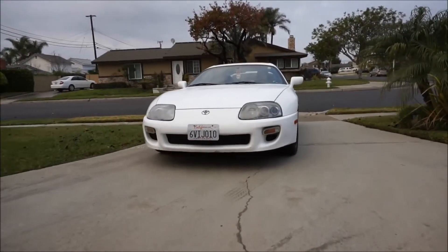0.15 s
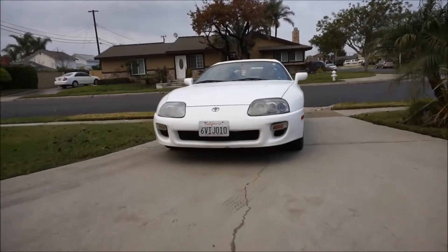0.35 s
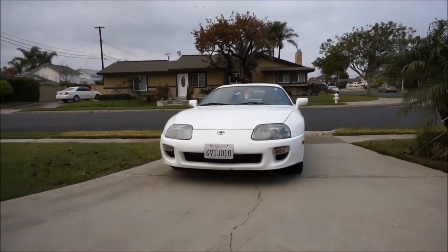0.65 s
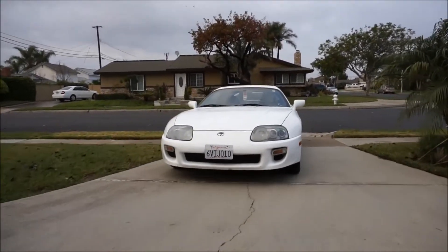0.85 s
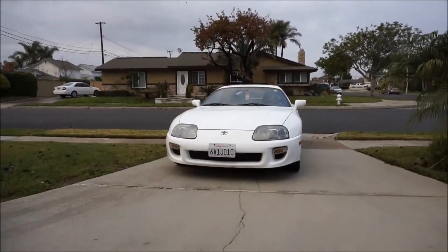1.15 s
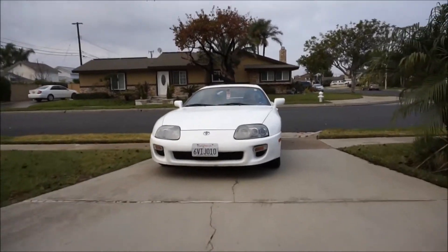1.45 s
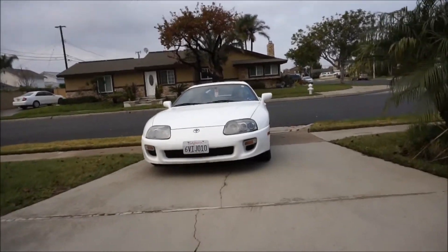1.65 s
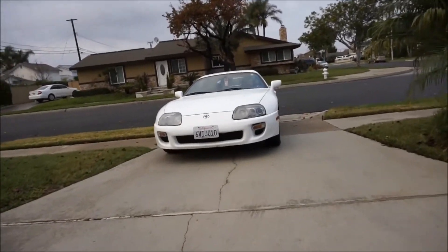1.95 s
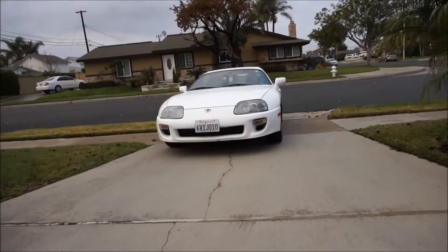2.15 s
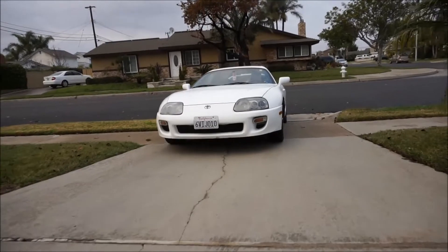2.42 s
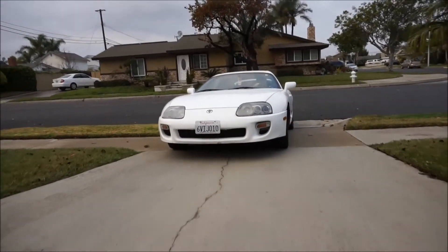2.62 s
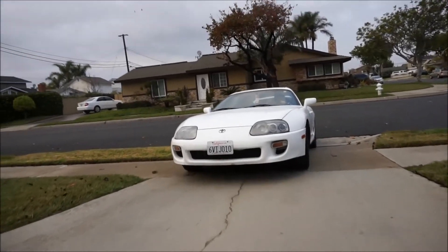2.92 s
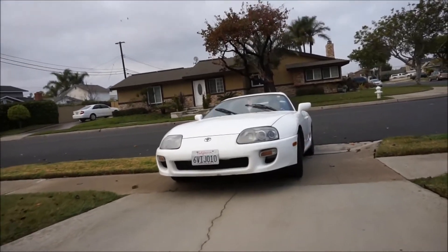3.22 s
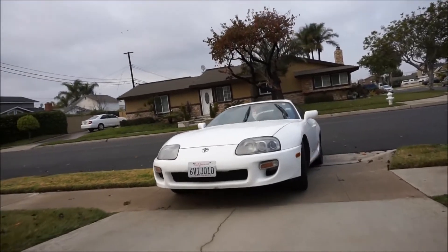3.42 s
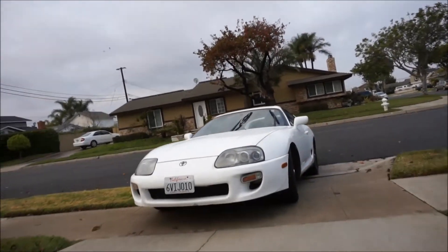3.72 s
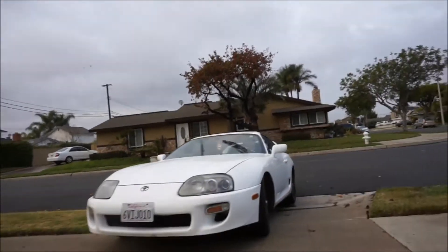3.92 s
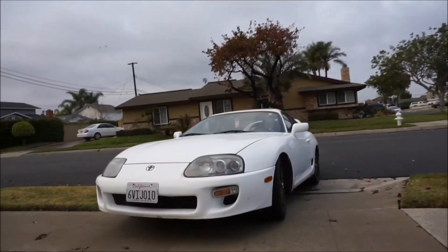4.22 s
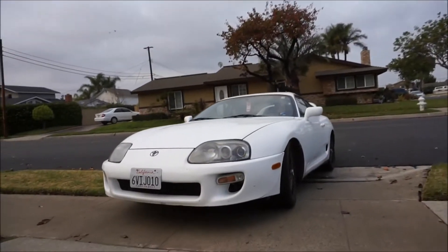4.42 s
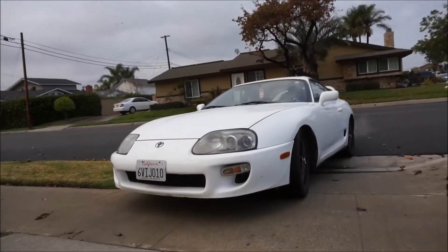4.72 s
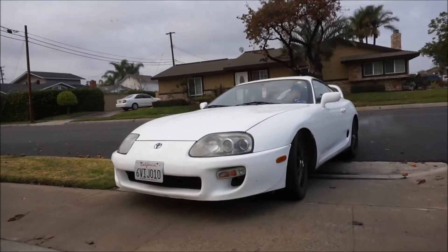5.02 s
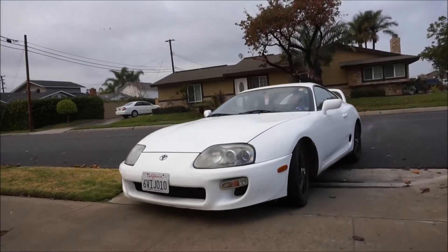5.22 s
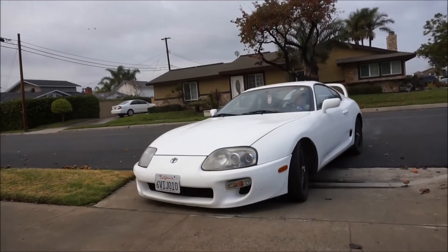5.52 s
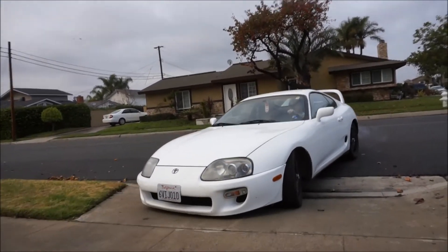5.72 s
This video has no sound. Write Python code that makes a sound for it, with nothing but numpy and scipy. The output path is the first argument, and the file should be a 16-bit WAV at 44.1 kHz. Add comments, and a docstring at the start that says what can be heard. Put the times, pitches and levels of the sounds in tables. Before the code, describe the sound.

Loud, boomy straight-six idle with engine-bay hiss and a few dull knocks, then a rising, blaring rev, stuttering squeals and falling revs.

```python
"""First a fast, droning idle: a straight-six sports car with an open exhaust backs down a driveway.
It is then revved up and drops back: crank orders sweep through the standing waves of the pipe over a rush of gas.
The engine bay whirrs and hisses from pulsed noise. Dull ringing knocks, light ticks, a thin hiss, a wiper swish
and a stuttering belt squeal sound on top; a limiter holds the peaks down."""
import sys
import numpy as np
from scipy import signal
from scipy.fft import rfft, irfft, next_fast_len
from scipy.io import wavfile
from scipy.ndimage import uniform_filter1d, minimum_filter1d

SR = 44100
rng = np.random.default_rng(int(sys.argv[2]) if len(sys.argv) > 2 else 0)


def store_wav(level_fs):
    """Save 16-bit WAV to argv[1]."""
    pcm = np.round(np.clip(np.atleast_2d(level_fs), -1, 1) * 32767)
    wavfile.write(sys.argv[1], SR, pcm.T.astype(np.int16))


N = 258862
TIME = np.arange(N) / SR
FFT_SIZE = next_fast_len(N, True)
BINS = np.maximum(np.fft.rfftfreq(FFT_SIZE, 1 / SR), 1)  # Hz

# The driver pulls away, takes the clutch out so that the revs flare, then lifts off
PULL_AT_S, OPEN_S = 3.834, 0.2
CLUTCH_OUT_AT_S, CLUTCH_S = 4.5, 0.13
LIFT_AT_S, SHUT_S = 4.97, 0.22
# The engine comes free of the load; the car turns its flank towards the microphone
FREE_AT_S, FREE_S = 4.54, 0.12
TURN_AT_S, TURN_S = 3.2, 1.25
# Crank speed over time: time_s, turns_per_s
CRANK_SPEED = [(0.0, 25.2), (1.13, 25.7), (1.52, 25.7), (2.79, 24.94), (3.78, 25.4), (4.0, 28),
               (4.23, 32.7), (4.56, 37.1), (4.63, 40.7), (4.74, 52.8), (4.79, 58), (4.86, 65.6),
               (4.94, 65.6), (5.03, 63.8), (5.41, 47.1), (5.68, 40), (5.87, 37.3)]

# How each layer follows the engine: idle_db, per_speed_doubling_db, load_db, full_strain_db, shut_throttle_db
EXHAUST_LAW = (0.85, 9.5, -2.5, -4.5, -17.5)  # on top of EXHAUST_IDLE
HISS_LAW = (3.5, 11.5, -6, 4, -6.5)  # on top of AIR_IDLE and the flank levels
SPRAY_LAW = (-2.5, 12.5, -5, 1, -9)  # on top of the high band of AIR_IDLE
RASP_LAW = (8.5, 10, -7.5, 1, -11)  # on top of the low band of AIR_IDLE
WHIRR_LAW = (-32, -1.5, 3, 5.5, -11)
RUMBLE_LAW = (-31.5, 1, -1, -8, -7)
GAS_LAW = (-20.5, -2, 5.5, 3, 4)  # relative to the exhaust note
LOPE_LAW = (0.35, -0.13, 0.8, 0.13, 0.2)  # depth of the uneven firing

# Low rumble spectrum: pitch_hz, level_db
RUMBLE_COLOUR = [(15, -11), (50, 3), (75, 3.5), (200, -43)]
# Stereo width: pitch_hz, side_minus_mid_db
STEREO_WIDTH = [(25, -13), (90, -27), (500, -13.5), (1000, -10), (4000, -5.5)]
# Lean to one side or the other: pitch_hz, left_minus_right_db
STEREO_LEAN = [(1400, 0), (3400, -2.5), (4300, 2), (6000, 1), (6600, 6.5), (7600, 0.7)]
# Reflections off concrete and body panels: first_delay_ms, last_delay_ms, gain relative to the direct sound
REFLECTIONS = [(4.4, 3.6, 0.15), (8.2, 9.3, 0.22)]

# Thin high hiss, one event: start_s, fade_start_s, level_db
WASHER_HISS = (1.92, 2.15, -33.5)
# Its broad resonance: pitch_hz, width_hz, level_db
WASHER_COLOUR = [(13100, 7900, 0)]
# Wiper swish envelope: time_s, level_db
WIPER_SWELL = [(3.6, -64), (3.68, -41), (3.74, -29), (3.8, -60)]
# Wiper swish spectrum: pitch_hz, level_db
WIPER_COLOUR = [(2000, -45), (3700, -1), (4500, -3), (6000, -10), (14000, -21)]
# Light ticks: start_s, level_db (before the common gain of the ticks)
TICKS = [(.305, -9), (3.928, -12), (4.018, -15)]
# Dull knocks: start_s, level_db, pitch as a share of the usual, crack_db relative to the knock
KNOCKS = [(0.806, -19, 1.45, 0.5), (1.124, -12, 1.17, -10.5), (1.142, -13, 0.91, -12),
          (1.207, -12.5, 1.1, -15), (1.533, -2.5, 1.18, -21), (1.606, -5.5, 1.3, -26),
          (1.617, -5.5, 1.26, -30), (3.524, -5, 1.08, -11), (3.53, -7.5, 1.42, -8), (3.537, -1, 0.79, -8),
          (3.546, 1, 0.99, -15), (3.774, -6, 0.69, -14), (3.781, -2, 1.06, -19), (3.789, -1.5, 1.14, -16)]
# Modes of the knocked body: pitch_hz, usual_level_db, t60_s
KNOCK_MODES = [(393, -5, 0.027), (549, 1, 0.042), (681, -6.5, 0.024), (862, -7.5, 0.022),
               (1125, -24, 0.036)]
# Belt slips: start_s, length_s, middle_pitch_hz, level_db
SQUEALS = [(4.845, .022, 1410, -17), (4.885, 0.054, 1420, -23), (4.935, 0.1, 1410, -26),
           (5.02, 0.04, 1624, -21), (5.05, .027, 1570, -13.5), (5.085, 0.036, 1600, -17),
           (5.122, 0.036, 1570, -17), (5.27, 0.038, 1325, -27)]
SQUEAL_SAG = 0.039  # share of its pitch that a squeal loses

# Engine hiss while rolling at idle: time_s, low_band_db, middle_band_db, high_band_db
AIR_IDLE = [(0.0, -32.5, -36, -31.5), (0.7, -34.5, -33.5, -32.5), (1.2, -36.5, -39.5, -35.5),
            (1.6, -36.5, -39.5, -35), (2.0, -34, -37, -34.5), (2.62, -30.5, -31.5, -31),
            (2.85, -34, -34.5, -34.5), (3.48, -35.5, -35.5, -35.5)]
# Splits between the hiss bands: low_to_middle_hz, middle_to_high_hz
BAND_EDGES_HZ = (3000, 4400)
# From the flank, the treble of the hiss grows faster with speed
FLANK_DB, FLANK_TREBLE_DB, TREBLE_DB_PER_DOUBLING = -31, -36, 4.5
# Engine bay resonances: pitch_hz, width_hz, ahead_db, flank_db
BAY_MODES = [(1957, 130, 7, -16.5), (2207, 205, -6, 3.5), (2730, 340, 0.5, -1), (3360, 285, -6.5, 5),
             (3534, 240, 2.5, -16), (5005, 167, 2, 1.5), (5380, 530, -3.5, -2.5), (6400, 330, 3, 1.5),
             (6770, 340, -3, 1), (7520, 190, -6.5, -3.5)]
# Smooth bed under those resonances: pitch_hz, level_db
BAY_BED = [(500, -43), (1000, -0.5), (1800, -0.5), (2450, -7.5), (3500, -3), (7000, -6), (8500, -15),
           (11000, -44)]
# Top layer of the hiss: pitch_hz, level_db
SPRAY_COLOUR = [(6000, -16), (8300, -1), (11400, 0.5), (11950, 5), (12500, 3), (13700, -2), (15000, -3.5),
                (15900, -7.5)]
# Belt drive resonances: pitch_hz, width_hz, idle_db, load_db
WHIRR_MODES = [(1330, 89, 0.5, -3.5), (1428, 84, -2, 4), (1600, 123, -5, -10)]
STROKE_JITTER_TURNS = .012
# Rasp resonances at idle: pitch_hz, width_hz, level_db
RASP_IDLE = [(427, 280, -2), (575, 123, 2), (638, 45, -0.5), (860, 113, -2)]
# Rasp resonances under load: pitch_hz, width_hz, level_db
RASP_LOAD = [(475, 61, 0), (550, 75, -3), (658, 63, -4.5), (860, 160, -8)]
# Blare at the top of the revs, one event: start_s, peak_s, release_s, level_db
BLARE = (4.78, 5.08, 0.06, -21.5)
# Pipe mode that blares: pitch_hz, width_hz, level_db
BLARE_MODE = [(555, 55, 0)]

# Gas rush spectrum: pitch_hz, level_db
GAS_COLOUR = [(50, -24), (90, -7), (180, 1.5), (300, -5.5), (400, -7.5), (700, -46)]
# Exhaust while rolling at idle: time_s, level_db, drone_top_share_db, drone_low_share_db
EXHAUST_IDLE = [(0.0, -9, -10, -8), (0.34, -10.5, -13.5, -4), (0.55, -11, 0, -3), (0.85, -10.5, -12, -3.5),
                (1.07, -12.5, 0, -1.5), (1.62, -14, -7, -1), (1.88, -10, -3.5, -5.5), (2.14, -13, -8, -5.5),
                (2.6, -11, -4.5, 0.5), (3.23, -8, -13, -1), (3.61, -10.5, -8.5, -3), (3.75, -11, -8, -2)]
# Balance of crank orders 2 to 13, one row each: idle_db, load_db, free_revving_db, shut_throttle_db
ORDERS = [(14, 13, 14.5, 13.5), (-13, -4.5, 11, 8.5), (7.5, 4.5, 11.5, 12), (5.5, 1.5, 0.5, 2),
          (2.5, 7.5, 8.5, 5.5), (5.5, -13, -0.5, -6), (-0.5, 5.5, -0.5, -5.5), (-14, -4.5, -4.5, -6.5),
          (-0.5, -0.5, -5, -10), (-10, -24, -21, -7), (-5, -4, -12, -19), (-11.5, -3, -11, -19)]
# Standing waves of the exhaust pipe: pitch_hz, width_hz, level_db
PIPE_MODES = [(96.8, 14.9, -8), (170.6, 16.4, -2), (197.4, 13.8, -5.5), (235.3, 20.3, -4),
              (257.5, 16.3, -6), (320, 17.6, -10), (486, 28, -9), (540.8, 60, -4)]
# Stumbles as the engine takes up the load: middle_s, half_length_s, level_db
STUMBLES = [(3.85, 0.034, -4.5), (3.957, 0.018, -7.5)]
# Top of the drone: its band and usual share; then the usual share of its low tone, the fourth order
DRONE_TOP_HZ, DRONE_TOP_WIDTH_HZ, DRONE_TOP_DB = 256, 39, -9
DRONE_LOW_DB = -3.5
# The pipe booms as the second order sweeps through its lowest standing wave
BOOM_HZ, BOOM_WIDTH_HZ, BOOM_DB = 94.6, 23, 4.5
# Phase jitter grows with frequency squared: under load, and for each speed doubling per second
ROUGH_RAD_PER_KHZ2, SURGE_ROUGH = 1.9, .5

LIMIT_DB, RELEASE_DB_PER_S, CUTOFF_HZ = -.5, 45.5, 15850


def from_db(db):
    """Decibels to gain."""
    return 10 ** (np.asarray(db) / 20)


def rms_one(x):
    """Scale to unit rms."""
    return x / np.sqrt(np.mean(x ** 2) + 1e-20)


def in_time(rows):
    """Each column of a curve at every sample."""
    s, *columns = np.transpose(rows)
    return [np.interp(TIME, s, c) for c in columns]


def ramp(start_s, length_s):
    """Straight rise from 0 to 1."""
    return np.clip((TIME - start_s) / length_s, 0, 1)


def smooth_gain(points):
    """Gain at every frequency from a short spectrum."""
    hz, db = np.transpose(points)
    return from_db(np.interp(np.log(BINS), np.log(hz), db))


def resonance(hz, centre_hz, damping_hz):
    """Complex response of one damped mode, 1 at its centre."""
    return 1 / (1 + 1j * (hz ** 2 - centre_hz ** 2) / (hz * damping_hz))


def peak_gain(modes):
    """Gain of a group of steep-sided resonances, each a mode squared, summed by power."""
    power = 0
    for hz, width_hz, db in modes:
        # squaring narrows the peak; 1.63 brings its -3 dB width back to about width_hz
        peak = from_db(db) * abs(resonance(BINS, hz, 1.63 * width_hz)) ** 2
        power = power + peak ** 2
    return np.sqrt(power)


def coloured(x, gain):
    """Filter a mid and a side signal into left and right; rms 1."""
    mid, side = rfft(x, FFT_SIZE) * gain * [np.ones_like(BINS), smooth_gain(STEREO_WIDTH)]
    lean = np.sqrt(smooth_gain(STEREO_LEAN))
    return rms_one(irfft([(mid + side) * lean, (mid - side) / lean])[:, :N])


def white():
    """Two unrelated noises."""
    return rng.standard_normal((2, N))


def drift(rate_hz):
    """Random wander with rms 1: noise smoothed twice at rate_hz, drawn at every 40th sample."""
    r = np.exp(-80 * np.pi * rate_hz / SR)
    raw = rng.standard_normal(N // 40 + 2002)
    slow = signal.lfilter([1], [1, -2 * r, r * r], raw)[2000:]  # skip the settling
    return np.interp(np.arange(N) / 40, np.arange(len(slow)), rms_one(slow))


def puffs(turns, depth_db, uneven_db):
    """Noise that swells with the crank's turning, with a random wander in level."""
    beat = sum(np.cos(2 * np.pi * k * turns) for k in (1, 2, 3))
    return white() * from_db(depth_db * beat + uneven_db * drift(36))


def strokes(turns, spread_db, uneven_db, count=12):
    """Sharp contacts every two turns, each with its own place and strength, never quite on time; rms 1."""
    places = (np.arange(count) + rng.random(count)) / count
    sizes_db = rng.normal(0, spread_db, count)
    when = 2 * (np.arange(int(turns[-1] / 2))[:, None] + places)
    when = when + rng.normal(0, STROKE_JITTER_TURNS, when.shape)
    at = np.minimum(np.searchsorted(turns, when), N - 1)
    clicks = np.zeros((2, N))
    clicks[:, at] = from_db(sizes_db + rng.normal(0, uneven_db, (2, *when.shape)))
    return rms_one(clicks)


def driving(rev_hz):
    """Engine state: speed doublings above idle, then load, strain and shut throttle, each 0-1."""
    strain = ramp(PULL_AT_S, CLUTCH_OUT_AT_S - PULL_AT_S) ** 2 * (1 - ramp(CLUTCH_OUT_AT_S, CLUTCH_S))
    return np.array([np.log2(rev_hz / rev_hz[0]), ramp(PULL_AT_S, OPEN_S), strain, ramp(LIFT_AT_S, SHUT_S)])


def follow(law, state):
    """A value at idle plus what speed, load, strain and the shut throttle add to it."""
    return law[0] + np.dot(law[1:], state)


def reflected(x):
    """Near surfaces comb the sound; the ridges drift as the car rolls away."""
    echoes, power = 0, 1
    for first_ms, last_ms, gain in REFLECTIONS:
        heard_at = TIME - np.linspace(first_ms, last_ms, N) / 1000
        echoes = echoes + gain * np.array([np.interp(heard_at, TIME, side) for side in x])
        power += gain ** 2
    return (x + echoes) / np.sqrt(power)


def rumble(state):
    """Low noise bed whose level follows the engine."""
    colour = smooth_gain(RUMBLE_COLOUR) / (1 + (BINS / 400) ** 2)
    return from_db(follow(RUMBLE_LAW, state)) * coloured(white(), colour)


def washer(attack_s, release_s):
    """Thin, high noise hiss, probably the washer jets ahead of the wipers."""
    start_s, fade_s, db = WASHER_HISS
    swell = ramp(start_s, attack_s) * (1 - ramp(fade_s, release_s))
    return from_db(db) * swell * coloured(white(), peak_gain(WASHER_COLOUR))


def wiper():
    """Wiper rubber sweeps the glass: a swell of coloured noise."""
    return from_db(in_time(WIPER_SWELL)[0]) * coloured(white(), smooth_gain(WIPER_COLOUR))


def ticks(t60_s):
    """Light ticks: bright noise that starts at once and decays exponentially."""
    bursts = sum((TIME >= s) * from_db(db - 60 * abs(TIME - s) / t60_s) for s, db in TICKS)
    return 0.45 * bursts * coloured(white(), peak_gain([(7000, 9000, 0)]))


def knocks(crack_t60_s, crack_top_hz, grains_per_s):
    """Each knock is a short gritty crack over the ringing modes of one dull body, randomly balanced."""
    out, t = np.zeros(N), TIME[:SR // 8]
    muffle = signal.butter(2, [420, crack_top_hz], "band", fs=SR, output="sos")
    for start_s, db, pitch, crack_db in KNOCKS:
        ring = 0
        for m, (hz, level_db, t60_s) in enumerate(KNOCK_MODES):
            decay = from_db(level_db + rng.normal(0, 1) - 60 * t / t60_s)
            ring = ring + (-1) ** m * decay * np.sin(2 * np.pi * hz * pitch * t)
        grains = rng.standard_normal(len(t)) * (rng.random(len(t)) < grains_per_s / SR)
        crack = rms_one(signal.sosfilt(muffle, grains)) * from_db(crack_db - 60 * t / crack_t60_s)
        out[round(start_s * SR):][:len(t)] += from_db(db) * (ring + crack)
    return out


def squeal(waver, edge_s):
    """The belt slips and grips as the revs turn over: each slip is a short, sharp-edged, sagging tone."""
    out, wobble = 0, 1 + waver * drift(64.1)
    for start_s, length_s, hz, db in SQUEALS:
        pitch_hz = hz * wobble * (1 - SQUEAL_SAG * (ramp(start_s, length_s) - .5))
        gate = ramp(start_s, edge_s) * (1 - ramp(start_s + length_s - edge_s, edge_s))
        out = out + from_db(db) * gate * np.sin(2 * np.pi * np.cumsum(pitch_hz) / SR)
    return out


def engine_bay(turns, doublings, bands_db, hiss_db, spray_db):
    """Fan and intake air, coloured by cavities under the bonnet; the colour shifts as the car turns."""
    bed, turned = smooth_gain(BAY_BED), ramp(TURN_AT_S, TURN_S)
    airs = puffs(turns, depth_db=0.3, uneven_db=1.0), puffs(turns, depth_db=0.67, uneven_db=.5)
    ahead = np.hypot(bed, peak_gain([(hz, width, db) for hz, width, db, _ in BAY_MODES]))
    aside = np.hypot(bed, peak_gain([(hz, width, db) for hz, width, _, db in BAY_MODES]))
    band = np.digitize(BINS, BAND_EDGES_HZ)
    front = sum(from_db(db) * coloured(airs[k % 2], ahead * (band == k)) for k, db in enumerate(bands_db))
    treble_db = FLANK_TREBLE_DB + TREBLE_DB_PER_DOUBLING * doublings
    treble = from_db(treble_db) * coloured(airs[0], aside * (band == 2))
    flank = from_db(FLANK_DB) * coloured(airs[1], aside * (band < 2)) + treble
    spray_air = puffs(turns, depth_db=0.27, uneven_db=1.03)
    spray = from_db(spray_db) * coloured(spray_air, smooth_gain(SPRAY_COLOUR))
    return from_db(hiss_db) * ((1 - turned) * front + turned * flank) + spray


def whirr(turns, load):
    """The belt drive chatters in a narrow band whose resonances change balance under load."""
    contacts = from_db(-4.5) * strokes(turns, spread_db=0.0, uneven_db=5.0)
    chatter = puffs(turns, depth_db=-1.5, uneven_db=1.0) + contacts
    idle = coloured(chatter, peak_gain([(hz, width, db) for hz, width, db, _ in WHIRR_MODES]))
    loaded = coloured(chatter, peak_gain([(hz, width, db) for hz, width, _, db in WHIRR_MODES]))
    return (1 - load) * idle + load * loaded


def rasp(turns, load):
    """Cracks and puffs of gas ring the upper pipe modes, which darken and throb under load."""
    cracks = from_db(-2.5) * strokes(turns, spread_db=1.0, uneven_db=1.5)
    idle = coloured(cracks + puffs(turns, depth_db=0.0, uneven_db=2.0), peak_gain(RASP_IDLE))
    loaded = coloured(cracks + puffs(turns, depth_db=1.5, uneven_db=-1.0), peak_gain(RASP_LOAD))
    return np.sqrt(1 - load) * idle + np.sqrt(load) * loaded


def blare(turns):
    """One pipe mode blares once in two turns; it builds up, then stops as the throttle closes."""
    start_s, peak_s, release_s, db = BLARE
    swell = ramp(start_s, peak_s - start_s) * (1 - ramp(peak_s, release_s))
    pulsed = white() * (1 + np.cos(np.pi * turns))
    return from_db(db) * swell * coloured(pulsed, peak_gain(BLARE_MODE))


def gas_rush(turns):
    """Turbulent gas: low noise that pulses with the crank."""
    colour = smooth_gain(GAS_COLOUR) / (1 + (BINS / 700) ** 4)
    return coloured(puffs(turns, depth_db=0.5, uneven_db=1.5), colour)


def crank_orders(turns, rev_hz, state, surge, top_db, low_db, waver_db, spread):
    """Sines at multiples of the crank rate, each swelling as it crosses a standing wave of the pipe."""
    load, free, shut = state[1], ramp(FREE_AT_S, FREE_S), state[3]
    rough = ROUGH_RAD_PER_KHZ2 * load + SURGE_ROUGH * surge
    pipe, note, power = peak_gain(PIPE_MODES), 0, 0
    for k, (idle_db, load_db, free_db, shut_db) in enumerate(ORDERS, 2):
        hz = k * rev_hz
        in_drone_top = 1 / (1 + ((hz - DRONE_TOP_HZ) / DRONE_TOP_WIDTH_HZ) ** 4)
        db = idle_db + (top_db - DRONE_TOP_DB) * in_drone_top
        if k == 4:
            db = db + low_db - DRONE_LOW_DB
        for share, next_db in ((load, load_db), (free, free_db), (shut, shut_db)):
            db = db + share * (next_db - db)
        line = np.interp(hz, BINS, pipe) * from_db(db)
        power = power + line ** 2 / 2
        # staggered orders give an even hum at idle; under load they close up into one hard beat a turn
        phase = 2 * np.pi * k * turns + 1.85 * k ** 2 - load * np.angle(np.exp(1.5j * k ** 2))
        phase = phase + rough * (hz / 1000) ** 2 * drift(45)
        # echoes from the houses shift each order a little between the two ears
        ears = spread * np.maximum(hz / PIPE_MODES[1][0], 1) * drift(3.1) * np.array([[1], [-1]])
        note = note + line * (np.cos(phase) - ears * np.sin(phase)) * from_db(waver_db * drift(11))
    return note / np.sqrt(power)


def exhaust(turns, rev_hz, state, waver_db, spread):
    """Crank orders over rushing gas; the shared level booms, lopes and stumbles with the engine."""
    level_db, top_db, low_db = in_time(EXHAUST_IDLE)
    # speed doublings per second while the revs rise, averaged over 50 ms
    surge = uniform_filter1d(np.maximum(np.gradient(state[0]) * SR, 0), size=2205)
    note = crank_orders(turns, rev_hz, state, surge, top_db, low_db, waver_db, spread)
    boom_db = BOOM_DB * abs(resonance(2 * rev_hz, BOOM_HZ, BOOM_WIDTH_HZ)) ** 2
    # the cylinders differ, so the level lopes once in two turns
    lope_db = follow(LOPE_LAW, state) * (np.cos(np.pi * turns) + drift(21.0))
    stumble_db = sum(db * np.exp(-((TIME - s) / half_s) ** 2) for s, half_s, db in STUMBLES)
    level_db = level_db + follow(EXHAUST_LAW, state) + boom_db + lope_db + stumble_db
    gas = from_db(follow(GAS_LAW, state)) * gas_rush(turns)
    return from_db(level_db) * (note * from_db([[.3], [-.3]]) + gas)  # the note sits slightly left


def scene():
    """The crank and the driver's pedals drive every engine layer."""
    rev_hz, = in_time(CRANK_SPEED)
    turns = np.cumsum(rev_hz * (1 + .003 * drift(16.3))) / SR
    state = driving(rev_hz)
    load, air_db = state[1], in_time(AIR_IDLE)
    extras = washer(attack_s=0.13, release_s=0.57) + wiper() + ticks(t60_s=0.0082)
    extras = extras + knocks(crack_t60_s=0.04, crack_top_hz=1520, grains_per_s=1500)
    spray_db = air_db[2] + follow(SPRAY_LAW, state)
    bay = engine_bay(turns, state[0], air_db, follow(HISS_LAW, state), spray_db)
    belt = from_db(follow(WHIRR_LAW, state)) * whirr(turns, load)
    cracks = from_db(air_db[0] + follow(RASP_LAW, state)) * rasp(turns, load)
    upper = reflected(bay + belt + cracks) + squeal(waver=0.0079, edge_s=0.0069)
    pipe = exhaust(turns, rev_hz, state, waver_db=1.0, spread=0.1)
    return rumble(state) + extras + upper + blare(turns) + pipe


def record(dry):
    """A limiter ducks everything under the peaks and recovers steadily; the extreme top is cut."""
    over_db = np.maximum(20 * np.log10(abs(dry).max(axis=0) + 1e-9) - LIMIT_DB, 0)
    recovery_db = RELEASE_DB_PER_S * TIME
    cut_db = np.maximum.accumulate(over_db + recovery_db) - recovery_db
    # 2 ms windows let the gain dip smoothly, ahead of each peak
    gain = uniform_filter1d(minimum_filter1d(from_db(-cut_db), size=89), size=89)
    low_pass = signal.ellip(10, .1, 80, CUTOFF_HZ, fs=SR, output="sos")
    return signal.sosfilt(low_pass, dry * gain)


dry = scene()
out = record(dry)
store_wav(out)
```